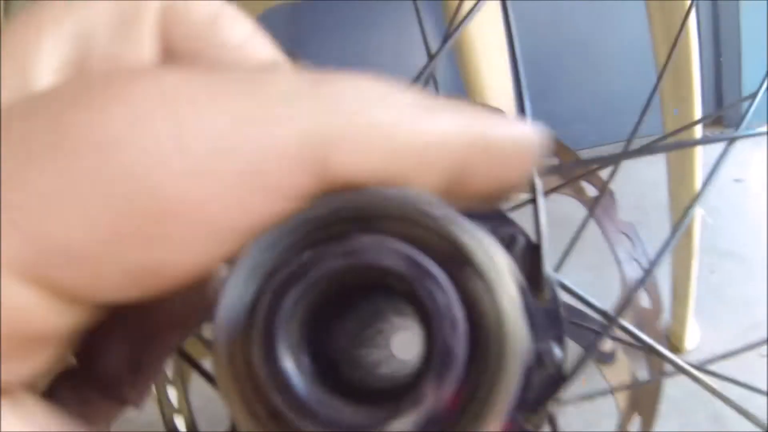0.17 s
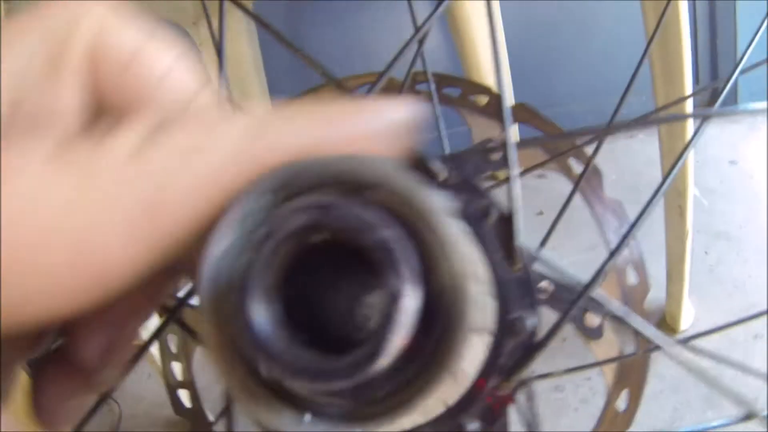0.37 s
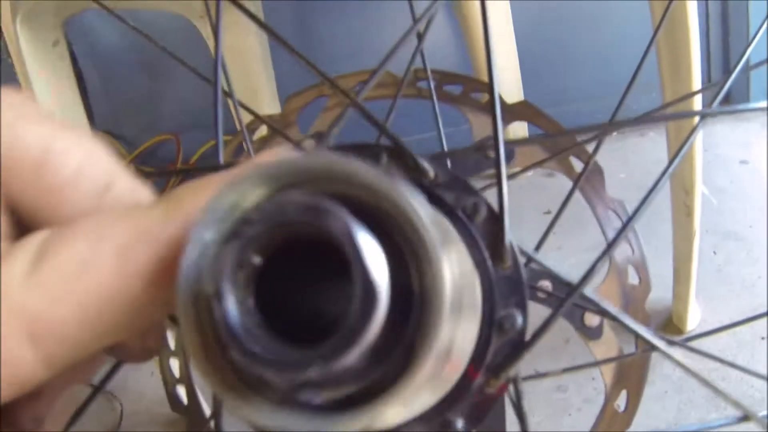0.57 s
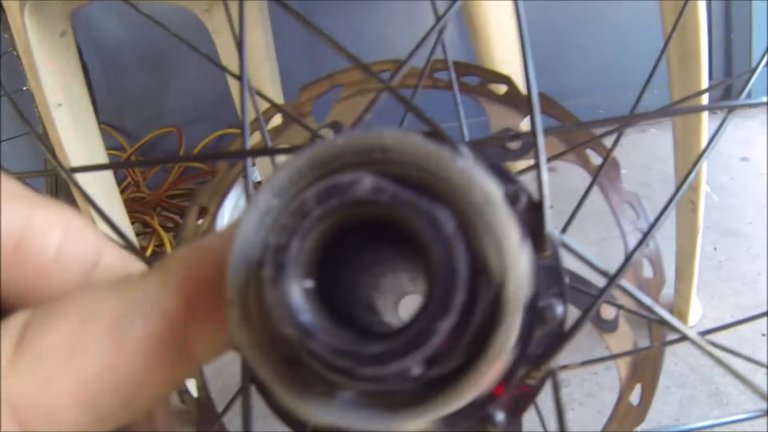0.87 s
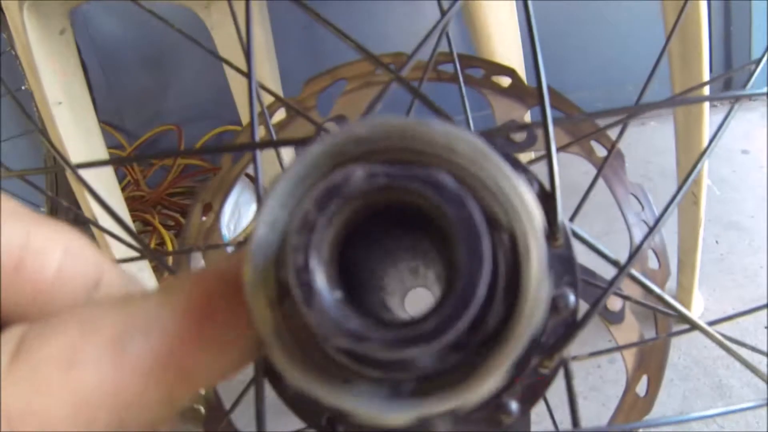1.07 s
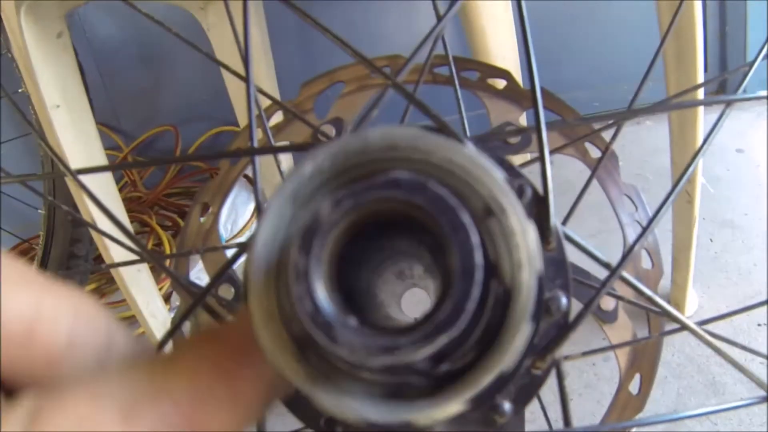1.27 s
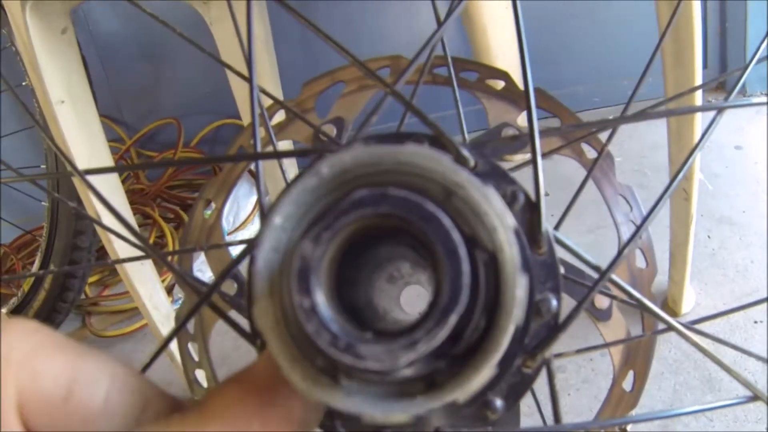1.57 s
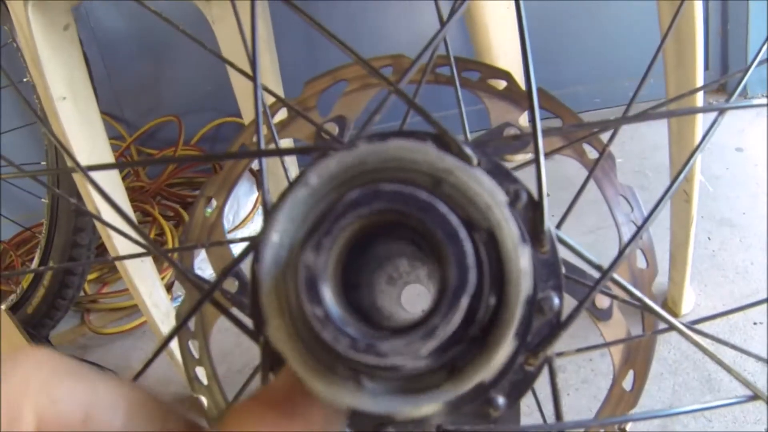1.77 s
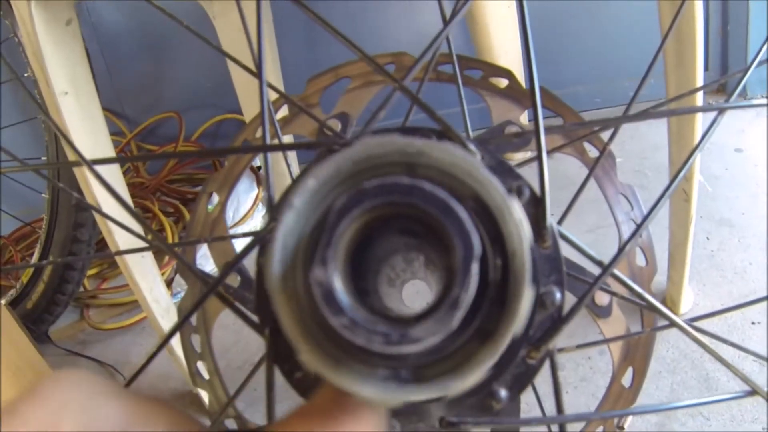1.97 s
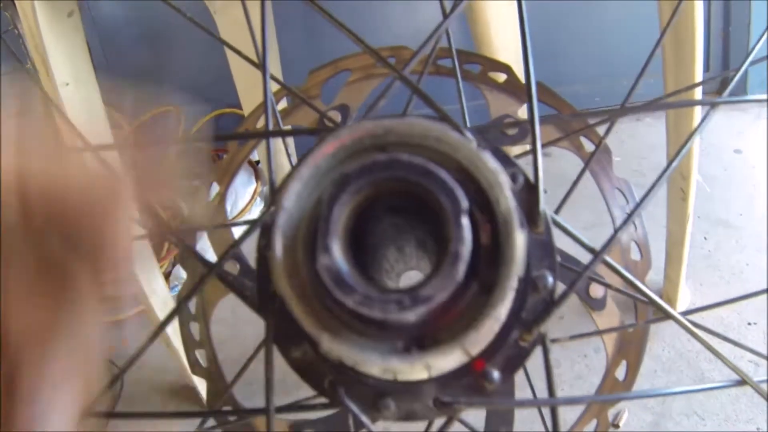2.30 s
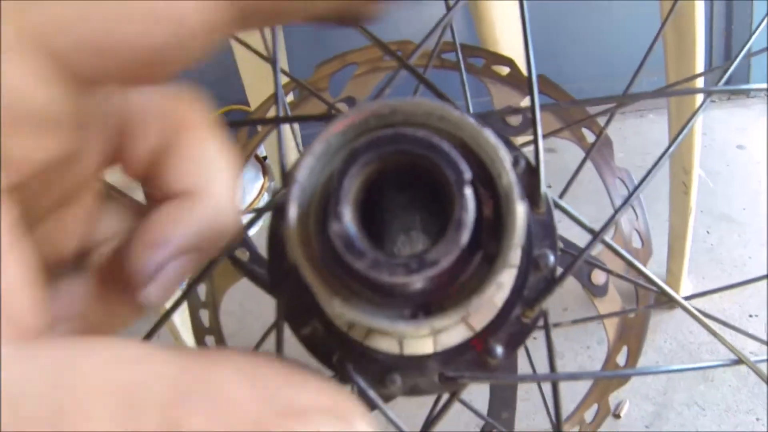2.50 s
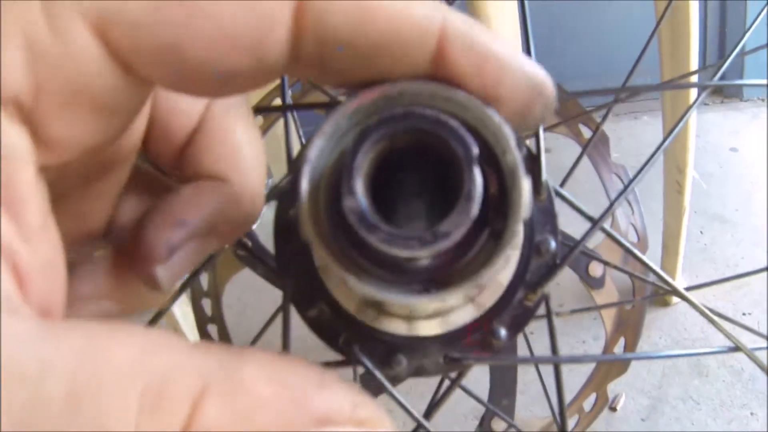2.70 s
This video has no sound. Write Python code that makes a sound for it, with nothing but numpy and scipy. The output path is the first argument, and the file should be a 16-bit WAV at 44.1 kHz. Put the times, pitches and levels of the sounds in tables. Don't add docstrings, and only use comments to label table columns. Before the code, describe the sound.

Close metallic ratchet clicks from a hand-turned bicycle hub, fast then slow, pausing, then two more clicks

```python
import sys
import numpy as np
from scipy import signal
from scipy.io import wavfile

SR = 44100
rng = np.random.default_rng(int(sys.argv[2]) if len(sys.argv) > 2 else 0)


def to_wav(sig):
    pcm = np.clip(np.atleast_2d(sig), -1, 1) * 32767
    pcm = np.round(pcm).astype(np.int16)
    wavfile.write(sys.argv[1], SR, pcm.T)


def boost(x):
    u = np.asarray(x, float) / 20
    return 10 ** u


N = 125685
LEAD = 2048


def rms_one(x):
    return x / np.sqrt(np.mean(x ** 2) + 1e-20)


def at_hz(points, hz):
    points_hz, values = np.transpose(points)
    return np.interp(np.log(hz), np.log(points_hz), values)


def resonance(x, hz, width_hz):
    r = np.exp(-np.pi * width_hz / SR)
    b = [(1 - r * r) / 2, 0, (r * r - 1) / 2]
    a = [1, -2 * r * np.cos(2 * np.pi * hz / SR), r * r]
    return signal.lfilter(b, a, x + 1e-18)


def narrow_noise(count, hz, width_hz):
    noise = rng.standard_normal(count)
    return resonance(resonance(noise, hz, width_hz), hz, width_hz)


def band_pass(x, low_hz, high_hz):
    return signal.sosfilt(signal.butter(2, [low_hz, high_hz], "band", fs=SR, output="sos"), x)


def fade(x, seconds):
    return signal.lfilter([1], [1, -np.exp(-1 / (seconds * SR))], x + 1e-18)


def bands(low_hz, count):
    white = rng.standard_normal((2, N + LEAD))
    edges = low_hz * 2 ** (np.arange(count + 1) / 3)
    return [(np.sqrt(low * high), band_pass(white[k % 2], low, high))
            for k, (low, high) in enumerate(zip(edges, edges[1:]))]


def hump(start_s, length_s):
    t = np.arange(N) / SR
    return np.sin(np.pi * np.clip((t - start_s) / length_s, 0, 1))


def train(s, gains):
    out = np.zeros(N + LEAD)
    place = np.clip(s * SR + LEAD, 0, N + LEAD - 1).astype(int)
    np.add.at(out, place, gains)
    return out


# main pawl in seconds, its level in dB,
# early pawl lead in ms, late pawl lag in ms, late pawl in dB against the main one.
QUICK_TEETH = [(-.012, -19, 2, 5, -2), (.2178, -19, 2, 2.5, 0), (.2456, -17, .5, 3, -2),
               (.2765, -21, 2, 3, -1), (.3066, -14, 0, 2, -5), (.3445, -19, 2.5, 2, 1),
               (.3934, -11, 2, 1.5, -4), (.4378, -18, 4, 2, 1), (.4832, -16, 1.5, 3, -2),
               (.5126, -17, 2, 3, -2), (.5381, -17, 1, 4, 0), (.565, -22, 2, 3.5, 1), (.5935, -19, 1, 3, 2),
               (.6305, -19, 4, 2.5, 0), (.6705, -22, 2, 2.8, 6), (.7212, -16, 3, 3, -5),
               (.7805, -19, 0, 5.3, 5), (.8418, -16, 4, 1.5, 0)]
SLOW_TEETH = [(.9075, -17, 0, 5.6, 4), (.9773, -13, 4.5, 2, -5), (1.0546, -16, 0, 7, -3),
              (1.1277, -19, 4.5, 2, 0), (1.1686, -18, 1, 3, -2), (1.2145, -21, 5, 3, -2),
              (1.2714, -20, 1.5, 4.5, -1), (1.3373, -21, 7, 6.5, 0), (1.4525, -16, 0, 7, -4),
              (1.5777, -19, 10, 9.7, -4), (1.7166, -16, 0, 6.7, -4), (1.8117, -17, 8.5, 10.4, -3),
              (1.894, -16, 0, 4, -3), (1.9752, -18, 7, 7, -2), (2.0547, -16, 1.5, 2, -3),
              (2.1094, -19, 5.5, 7, -2), (2.7804, -17, 2, 2, -2), (2.8212, -23, 4, 4, 0)]
QUICK_CHANGE_DB = [0, 0.5, 0, 4.5, -1.5, 0, -4, 0.5, -5, 1.5, 0, 1, -0.5, -1.5, 0.5, 0, -1.5, -3.5]
SLOW_CHANGE_DB = [-3.5, -3.5, -0.5, 0.5, 1, 4.5, 2, 3.5, -1.5, 2.5, -2, -0.5, -2, 0.5, -3, 1.5, 0, 3.5]
# start in seconds, level in dB.
FINGER_TICKS = [
    (0.168, -55),
    (.4695, -38.5),
    (2.19, -56),
    (2.4935, -62),
    (2.53, -65),
    (2.555, -57),
    (2.64, -72),
    (2.725, -61.5),
]


def drops():
    s, db, lead_ms, lag_ms, late_db = np.transpose([*QUICK_TEETH, *SLOW_TEETH])
    db = db + np.array([*QUICK_CHANGE_DB, *SLOW_CHANGE_DB])
    tick_s, tick_db = np.transpose(FINGER_TICKS)
    early_db = np.minimum(db, db + late_db) - 15
    firm_s = np.concatenate([s, s + lag_ms / 1000])
    firm_db = np.concatenate([db, db + late_db])
    soft_s = np.concatenate([s - lead_ms / 1000, tick_s])
    soft_db = np.concatenate([early_db, tick_db])
    return firm_s, firm_db, soft_s, soft_db


# lowest Hz, highest Hz; in the order of the columns below.
PARTS_HZ = [(850, 1600), (1700, 2100), (2100, 2800), (3000, 3800), (10200, 11500)]
# rim thump in dB,
# long spokes in dB, short spokes in dB, shell in dB, ratchet ring in dB.
TOOTH_SHAKES = [(13, 1, 0, 7.5, 1), (7.5, -18, 1.5, -2, -3.5), (5, -3.5, 1.5, 3.5, -3),
                (-9, -4, -4.5, -9, -4.5), (-6.5, 4.5, 0.5, -2, -3), (1, -7, 0.5, 1, -1),
                (-2, 3.5, -7, 1, 1.5), (3, -13.5, 1.5, 4, -2), (10, -19, 3.5, -2, 6.5),
                (-2, -6, 2.5, -8, 1.5), (7.5, -4, -8, -7, -2), (-1, -8, 5.5, 2, -0.5),
                (3, -6.5, 2, -4.5, 4), (7.5, -1.5, 1.5, 1, 1.5), (4.5, -5, 1, -3.5, 0.5),
                (3.5, -18.5, 2.5, 3.5, -0.5), (-0.5, -8.5, -0.5, -5, 1.5), (3.5, -10, 6, 3.5, 3.5),
                (2, -9, 2, 1.5, 4), (7.5, -18, -5.5, 2.5, 1.5), (3, -16, 4.5, 1.5, 0),
                (4.5, -9, -1.5, -0.5, -4), (-12, -20, 4.5, 2, -1.5), (-2, -5, 0, 2, -3),
                (1, -3, 3.5, 1, -1), (-21, -2.5, -1, 3.5, -3.5), (0, -2, 4, 2, 3), (-17, -1, -0.5, 1.5, 1),
                (3, -8, 3, 4.5, 4), (-21, -7, 2, 1.5, 1), (-12, -3, 1, 5, 3), (-3, -14, 2, 3.5, -0.5),
                (3, 3.5, -1, 1, 1.5), (-4, -4, 0, 4, -2), (4, -24, 3, 4, -1), (3, -16, 0.5, 4.5, -4)]


def shakes(hz, count):
    for part, (low_hz, high_hz) in enumerate(PARTS_HZ):
        if low_hz <= hz < high_hz:
            return np.resize(np.array(TOOTH_SHAKES)[:, part], count)
    return np.zeros(count)


# centre in Hz, width in Hz, level in dB.
SNAP_BODY = [(1017, 130, -21), (1442, 37, -19), (2270, 270, -9), (3320, 140, -12.5), (4760, 190, -11.5),
             (6180, 460, -6), (8320, 590, -1.5), (9300, 270, -5), (10815, 580, 7), (11180, 2700, -4.5),
             (12700, 420, -13), (13740, 1800, -2)]


def snap(s, db, firm=True):
    chatter_s, chatter_db, grit_db, varies_db = 0.0027, -1, 1.5, 1.8
    grit = rng.standard_normal(N + LEAD) * boost(grit_db * rng.standard_normal(N + LEAD))
    vary = varies_db * rng.standard_normal((len(s), len(SNAP_BODY)))
    out = 0
    for k, (hz, width_hz, level_db) in enumerate(SNAP_BODY):
        hits = train(s, boost(db + level_db + firm * shakes(hz, len(s)) + vary[:, k]))
        drive = 3 * hits + boost(chatter_db) * grit * fade(hits, chatter_s)
        out = out + (-1) ** k * resonance(drive, hz, width_hz) * np.sqrt(SR / 20 / width_hz)
    return boost(-4.5) * out


def crack(s, db, ms, top_hz):
    burst = rng.standard_normal(N + LEAD) * fade(train(s, boost(db)), ms / 1000)
    return band_pass(burst, 2680, top_hz)


# pitch in Hz, level in dB, time to fall 60 dB in seconds.
HUB_MODES = [(1728, -50, .2), (1900, -34, .035), (2040, -41, .08), (2114, -43, .1), (2369, -42, .1),
             (2492, -45, .12), (2610, -51, .28), (5250, -52, .28), (6240, -43, .08), (7205, -44, .13),
             (7335, -47, .12), (8245, -42, .12), (9160, -38, .09), (9322, -60, .5),
             (2250, -33, .04), (3410, -35, .04), (3480, -36, .045), (8863, -40, .08), (9630, -38, .1),
              (9950, -40, .06), (10516, -35, .06), (10690, -27, .045), (10860, -33, .04), (11150, -43, .09),
              (11677, -41, .07), (12700, -46, .07), (14000, -41, .05)]


def ringing(s, db):
    detune_cycles, varies_db = 1.2, 4.0
    modes = HUB_MODES
    vary = varies_db * rng.standard_normal((len(s), len(modes)))
    sign = np.sign(rng.standard_normal(vary.shape))
    stray = np.resize(rng.integers(-1, 2, (len(TOOTH_SHAKES), len(modes))), vary.shape)
    out = 0
    for k, (hz, level_db, t60) in enumerate(modes):
        gains = sign[:, k] * boost(db + level_db + 12.5 + shakes(hz, len(s)) + vary[:, k])
        r = boost(-60 / (t60 * SR))
        for step in (-1, 0, 1):
            w = 2 * np.pi * (hz + step * detune_cycles / t60) / SR
            hits = train(s, gains * (stray[:, k] == step))
            out = out + signal.lfilter([0, np.sin(w)], [1, -2 * r * np.cos(w), r * r], hits + 1e-18)
    return out


# frequency in Hz, level in dB per Hz.
TAIL_COLOUR = [(530, -53.5), (900, -23.5), (1840, -4.5), (2450, -9.5), (2890, -10), (4550, -14),
               (5240, -13.5), (11000, -8), (15500, -38)]
# frequency in Hz, time to fall 60 dB in seconds.
TAIL_DECAY = [(1000, 0.18), (2500, 0.31), (6000, 0.099), (14000, 0.14)]


def tail(s, db):
    rise_s, walls_db, walls_t60_s = 0.0017, -12, 0.37
    per_t60 = np.log(10 ** 6)
    out = 0
    for hz, noise in bands(760, count=13):
        hits = train(s, boost(db + shakes(hz, len(s)) / 2) ** 2)
        power = fade(hits, rise_s) / (rise_s * SR)
        wheel = fade(power, at_hz(TAIL_DECAY, hz) / per_t60)
        walls = boost(walls_db) ** 2 * fade(power, walls_t60_s / per_t60)
        out = out + boost(-11 + at_hz(TAIL_COLOUR, hz)) * noise * np.sqrt(wheel + walls)
    return out


def hub():
    s, db, soft_s, soft_db = drops()
    firm = snap(s, db) + crack(s, db - 10.5, 0.76, 17000) + ringing(s, db) + tail(s, db)
    soft = crack(soft_s, soft_db + 2, 4, 12400) + boost(2.0) * snap(soft_s, soft_db, firm=False)
    out = (firm + soft)[LEAD:]
    top_ring = resonance(out, 10800, 1500) * (np.arange(N) > 2.7 * SR)
    return out - (1 - boost(0.5)) * top_ring


# time in seconds, pitch in Hz, level in dB.
MOTOR_HUM = [(0.0, 43, -37), (0.05, 42.44, -31), (0.93, 42.76, -37.5), (0.98, 42.7, -36), (1.02, 42.5, -42),
             (1.07, 42.8, -30.5), (1.14, 41.6, -38.5), (1.3, 43.2, -36), (1.34, 44.2, -46),
             (1.39, 42.76, -32.5), (1.86, 42.06, -38.5), (1.87, 42.13, -34.5), (2.81, 42.5, -34),
             (2.85, 42.1, -31)]
# start in seconds, length in seconds, pitch in Hz, level in dB.
MOTOR_SWELLS = [
    (-.2, 0.43, 204.7, -52),
    (0.963, 0.634, 207, -46.5),
    (1.797, 0.68, 207.3, -52),
    (0.752, 0.34, 142.8, -51.5),
    (1.297, .6, 139.4, -50),
    (1.94, 0.97, 279.5, -59.5),
    (2.608, 0.45, 177.6, -52),
]
# centre in Hz, width in Hz, level in dB.
MOTOR_DRONE = [(27, 12, -50.5), (90.9, 10, -54), (146.3, 6.1, -74), (206.2, 21, -55), (273.6, 4.65, -70),
               (13660, 60, -82)]


def motor():
    t = np.arange(N) / SR
    s, hz, db = np.transpose(MOTOR_HUM)
    phase = 2 * np.pi * np.cumsum(np.interp(t, s, hz)) / SR
    out = np.sqrt(2) * boost(np.interp(t, s, db)) * np.sin(phase)
    for start_s, length_s, partial_hz, level_db in MOTOR_SWELLS:
        partial = np.sqrt(2) * np.sin(2 * np.pi * partial_hz * t)
        out = out + boost(level_db) * hump(start_s, length_s) * partial
    for centre_hz, width_hz, level_db in MOTOR_DRONE:
        out = out + boost(level_db) * rms_one(narrow_noise(N + SR, centre_hz, width_hz)[SR:])
    return out


# frequency in Hz, level in dB per Hz.
AIR_COLOUR = [(35, -27), (60, -3), (160, -8.5), (281, -16), (398, -23), (1380, -31.5), (5000, -46.5),
              (15500, -55)]


def air():
    floor = sum(boost(at_hz(AIR_COLOUR, hz)) * noise for hz, noise in bands(53.65, count=25))[LEAD:]
    rumble = band_pass(rng.standard_normal(N + SR), 34, 76.4)[SR:]
    return boost(-46.5) * rms_one(floor) + boost(-44) * rms_one(rumble)


# start in seconds, length in seconds.
RUB_TIMES = [
    (2.58, .21),
    (2.56, .22),
    (2.62, .1),
    (-.1, .31),
    (-.1, .3),
    (2.842, .02),
]
# centre in Hz, width in Hz, level in dB.
RUB_COLOURS = [(2753, 1500, -61.5), (3060, 450, -83), (594, 19, -55.5), (10600, 910, -62),
               (6740, 7500, -65.5), (637, 1170, -51.5)]


def fingers():
    out = np.zeros(N)
    for (start_s, length_s), (hz, width_hz, db) in zip(RUB_TIMES, RUB_COLOURS):
        out += boost(db) * hump(start_s, length_s) * rms_one(narrow_noise(N, hz, width_hz))
    return out


def scene():
    return (hub() + motor() + air() + fingers())[None]


# middle in seconds, length in seconds, sinks above Hz, change
# in dB.
TREBLE_DIPS = [
    (.083, .014, 2500, -8),
    (.461, .01, 700, -10),
    (.768, .022, 700, -12),
    (1.684, .024, 3500, -11),
    (2.365, .02, 3000, -9),
    (2.452, .028, 3000, -8),
    (2.632, .036, 4000, -16),
]


def sink_treble(x):
    t, out = np.arange(N) / SR, x
    for middle_s, length_s, hz, db in TREBLE_DIPS:
        treble = signal.sosfiltfilt(signal.butter(4, hz, "high", fs=SR, output="sos"), x)
        dip = np.clip(2 - 4 * abs(t - middle_s) / length_s, 0, 1)
        out = out - (1 - boost(min(db, 0))) * treble * dip
    return out


def roll_off(x):
    return signal.sosfilt(signal.butter(12, 16500, fs=SR, output="sos"), x)


def record(dry):
    step = signal.ellip(3, 1.5, 14, 15050, fs=SR, output="sos")
    end = signal.butter(10, 15700, fs=SR, output="sos")
    mix = signal.sosfilt(np.vstack([step, end]), sink_treble(dry))
    return roll_off(mix)


dry = scene()
out = record(dry)
to_wav(out)
```